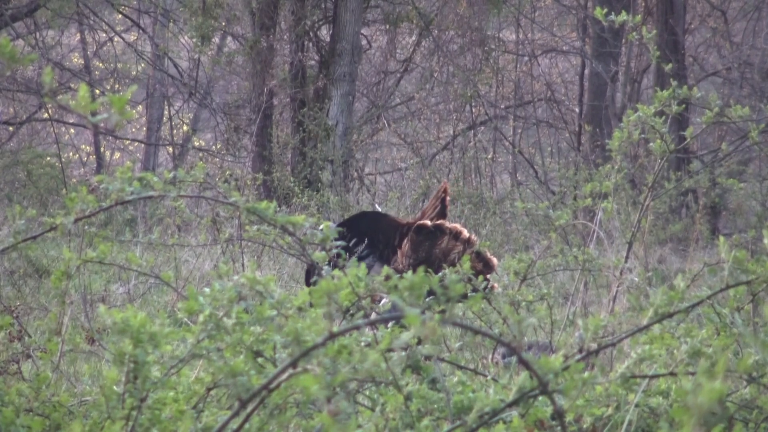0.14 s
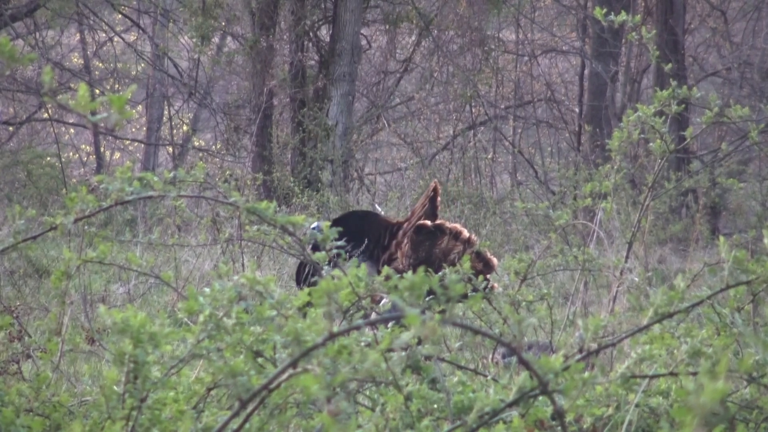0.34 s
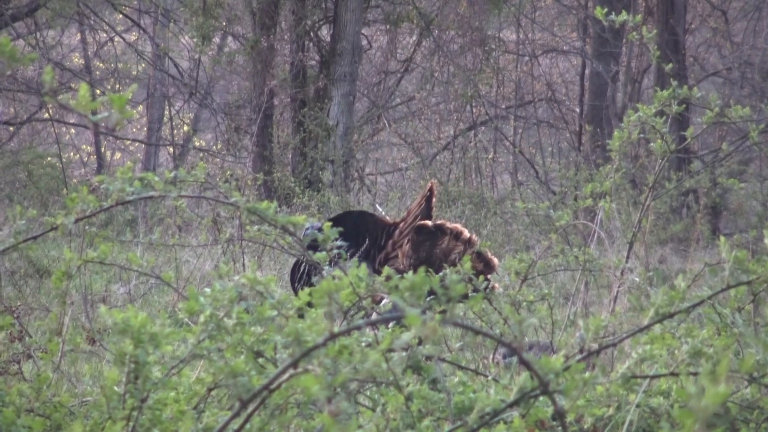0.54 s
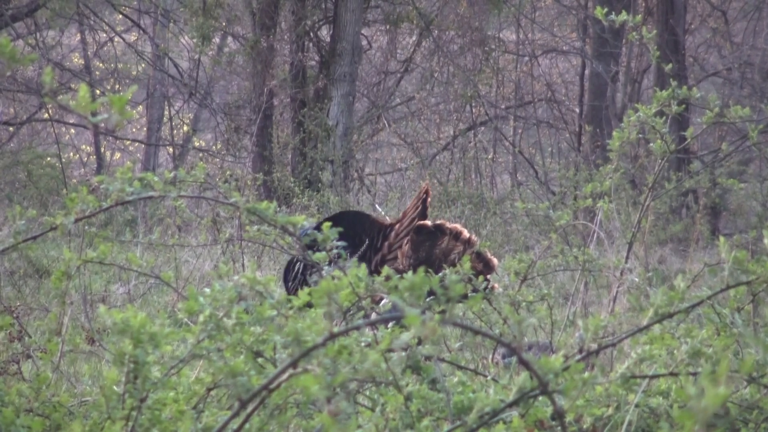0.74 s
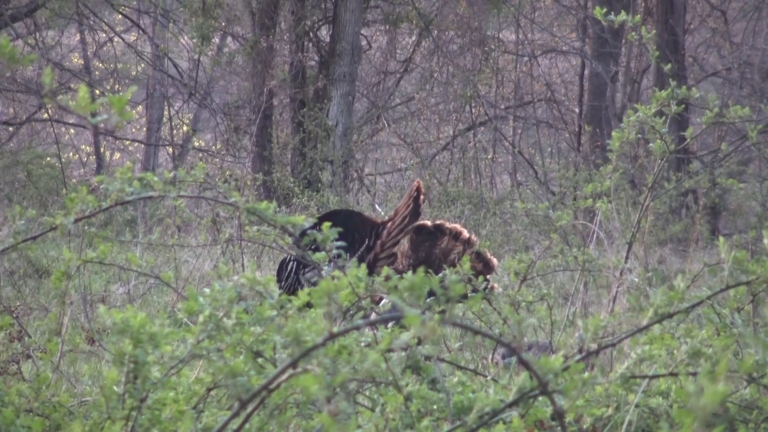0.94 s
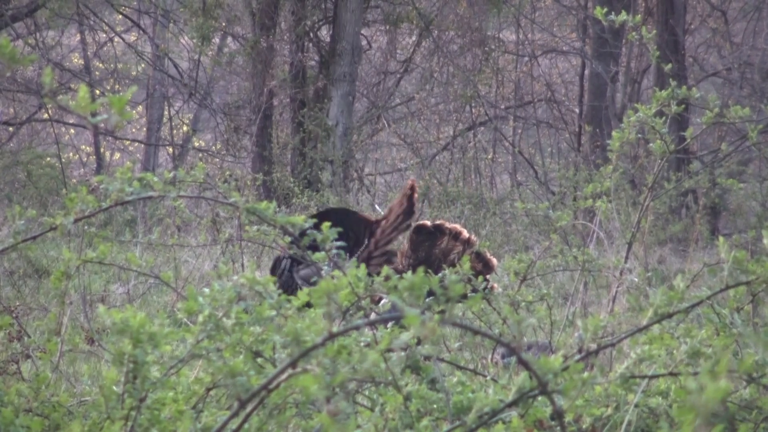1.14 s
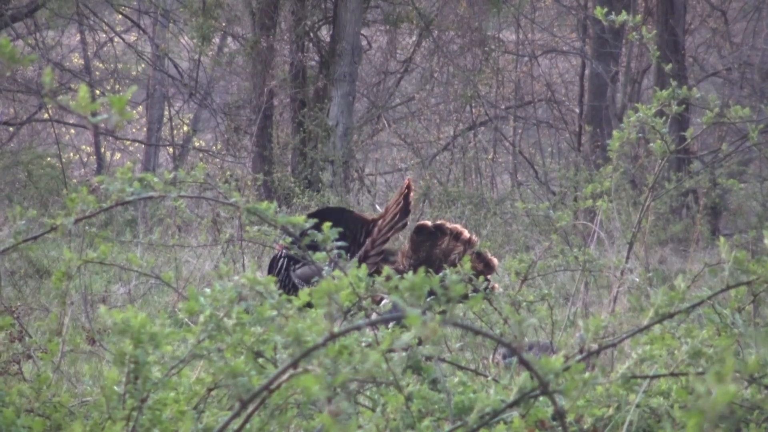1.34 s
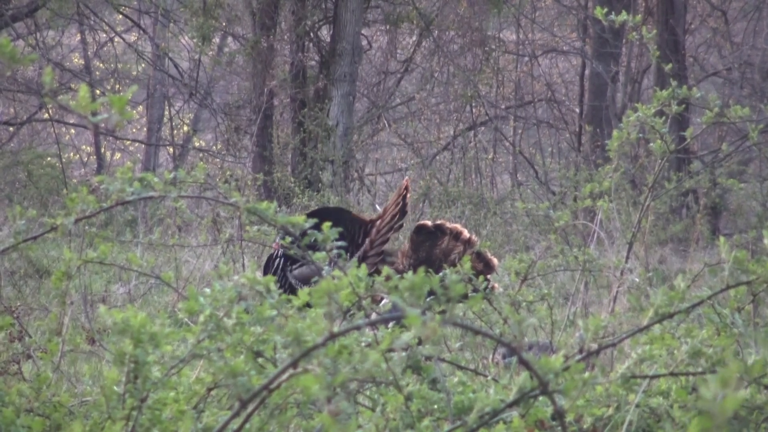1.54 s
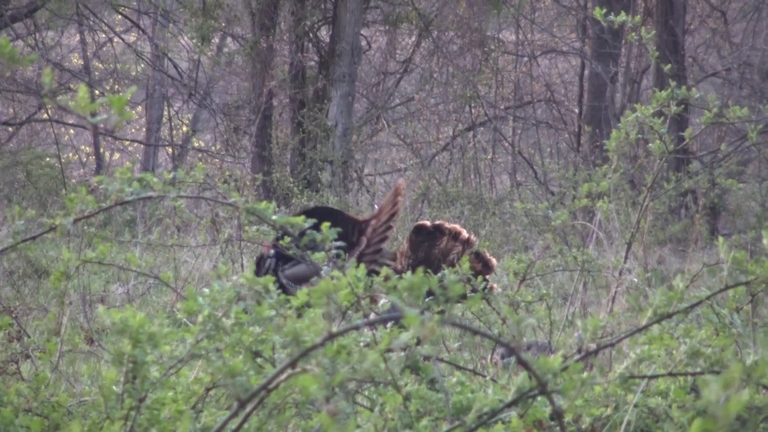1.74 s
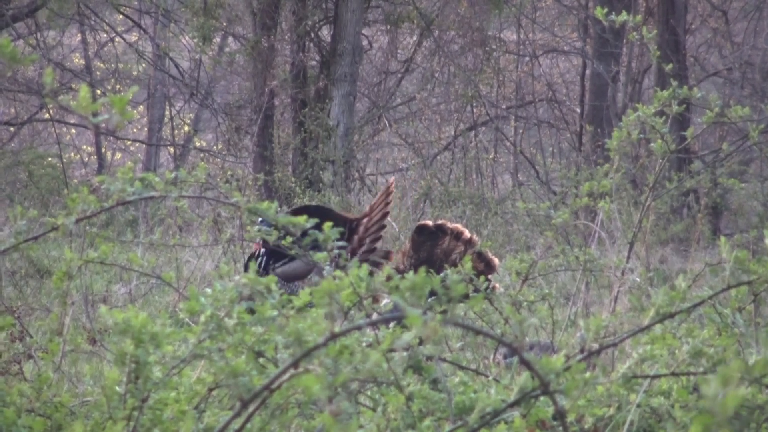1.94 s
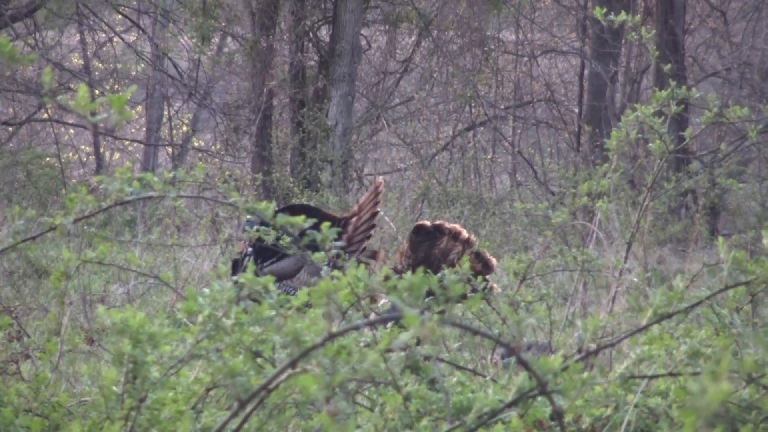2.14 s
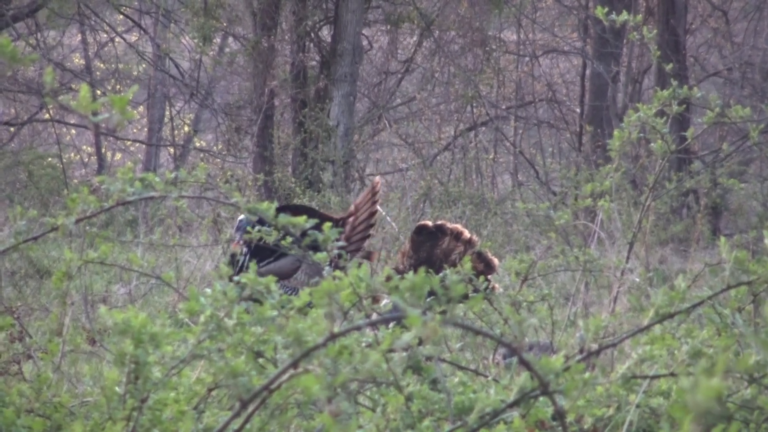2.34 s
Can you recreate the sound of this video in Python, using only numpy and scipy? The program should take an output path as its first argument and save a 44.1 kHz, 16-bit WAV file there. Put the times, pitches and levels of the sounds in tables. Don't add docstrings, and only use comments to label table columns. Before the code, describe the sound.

Wild turkey gives seven sharp, raspy clucks close by, ringing through spring woods with faint songbirds

```python
import sys
import numpy as np
from scipy import signal
from scipy.fft import rfft, irfft, next_fast_len
from scipy.io import wavfile
from scipy.ndimage import uniform_filter1d, map_coordinates

SR = 44100
rng = np.random.default_rng(int(sys.argv[2]) if len(sys.argv) > 2 else 0)


def level_to_linear(level):
    exponent = np.asarray(level, float) / 20
    return 10 ** exponent


def generate_wav(signal):
    frames = np.transpose(np.atleast_2d(signal))
    scaled = np.clip(frames, -1, 1) * 32767
    pcm = np.round(scaled).astype(np.int16)
    wavfile.write(sys.argv[1], SR, pcm)


N = 103635

# frequency [Hz], density [dB per Hz].
RUMBLE = [(12, -57.5), (20, -12), (102, 2.5), (168, 3), (265, -7.5), (357, -10), (414, -21), (461, -20.5),
          (500, -30), (650, -39), (1100, -120)]
# frequency [Hz], density [dB per Hz].
AIR = [(210, -61.5), (350, 0.5), (1540, -9), (2080, -15), (2600, -13), (3990, -19.5), (4470, -23),
       (5070, -23), (15700, -37)]
# frequency [Hz], density [dB per Hz].
LEAVES = [(200, -35), (350, -2.5), (800, -1), (1500, -2), (2300, -38.5)]
# centre [s], half length [s], level [dB].
GUSTS = [
    (0.784, 0.14, -39.5),
    (1.827, 0.027, -40.5),
    (1.32, 0.037, -39),
]
# frequency [Hz], time to fall 60 dB [s].
WOODS = [(500, 0.28), (1500, 0.99), (3000, 0.43), (4400, 0.36), (10000, 0.23)]

# time [s], pitch [Hz], level [dB].
NEAR_BIRD = [
    [(0, 4380, -27.5), (.05, 4372, -31.5), (.066, 4320, -37.5), (.078, 4440, -56.5)],
    [(.815, 4730, -59.5), (.83, 4650, -68), (.843, 5350, -56), (.855, 4260, -58), (.865, 3460, -80)],
    [(1.858, 4050, -64), (1.868, 5270, -42), (1.882, 3620, -58)],
    [(1.862, 3380, -58), (1.87, 3330, -45.5), (1.88, 2740, -86)],
    [(1.895, 4840, -66), (1.905, 3980, -44), (1.915, 3640, -52)],
    [(1.995, 4390, -62), (2.02, 4250, -33), (2.042, 4450, -41), (2.056, 4750, -42), (2.07, 5250, -41),
     (2.12, 5300, -49), (2.135, 5430, -54)],
    [(2.14, 4330, -53.5), (2.25, 4506, -52), (2.35, 4400, -51)],
    [(2.06, 3270, -37), (2.075, 3470, -52.5), (2.135, 3660, -34.5), (2.165, 3520, -40.5),
     (2.182, 3210, -53)],
]
# time [s], pitch [Hz], level [dB].
SEETS = [
    [(.512, 9730, -60), (.545, 7990, -44.5), (.575, 7580, -46), (.63, 7900, -46), (.67, 8540, -68),
     (.685, 8350, -80)],
    [(.52, 9900, -98.5), (.548, 8500, -46.5), (.585, 8300, -52), (.65, 9000, -56), (.68, 9000, -76)],
    [(2.0, 9500, -81), (2.03, 7940, -49.5), (2.048, 8000, -69), (2.06, 7900, -60)],
    [(2.27, 8100, -58), (2.3, 7520, -53.5), (2.33, 7370, -52), (2.35, 7620, -52)],
    [(2.285, 8300, -61), (2.31, 7900, -59), (2.35, 8100, -60)],
]
# time [s], pitch [Hz], level [dB].
WHISTLER = [
    [(.625, 2844, -57), (.64, 2910, -34.5), (.662, 2947, -29.5), (.68, 2890, -41), (.71, 2360, -38),
     (.73, 2360, -68)],
    [(.865, 2537, -51), (.898, 2907, -30), (.926, 2908, -28), (.945, 2883, -35.5), (.982, 2240, -35),
     (.998, 2200, -50)],
    [(1.11, 2550, -36.5), (1.15, 2850, -36.5), (1.17, 3100, -36.5)],
    [(1.245, 2880, -44), (1.28, 2910, -46), (1.35, 2846, -49.5)],
]
# time [s], pitch [Hz], level [dB].
WHISTLER_TURNS = [
    [(.75, 2270, -59), (.765, 2690, -42), (.78, 2700, -80)],
    [(.825, 2420, -60), (.835, 2550, -61), (.845, 2760, -55.5)],
    [(1.005, 2180, -41), (1.035, 2480, -48.5), (1.06, 2765, -36.5), (1.08, 2700, -67)],
    [(2.25, 2610, -104), (2.28, 2630, -45.5), (2.33, 2700, -64), (2.345, 2634, -60)],
]
# time in the note [s], pitch [Hz], level [dB].
TRILL_NOTE = [(0, 5750, -12), (.006, 5300, -3), (.014, 4350, 0), (.021, 3750, -14)]

STARTS = [.2085, .343, 1.0555, 1.1725, 1.381, 1.6575, 1.920]
# length [s], opening pitch [Hz], glide [share per s], clear part [s],
# rasp share inside the clear part [0-1].
CLEAR = [
    (.053, 570, 3.5, .034, .3),
    (.09, 1520, -.8, .038, .45),
    (.056, 790, 2, .012, .7),
    (.064, 2230, -9, .014, .15),
    (.069, 1515, 0, .011, .15),
    (.05, 750, 0, .025, .75),
    (.068, 1480, .5, .022, .55),
]
# low resonance [Hz], its level [dB], chest level [dB], late beak level [dB],
# level of the upper resonances [dB].
SHAPES = [(652, 6.5, 2, -4.5, 5), (1050, -11.5, 2, -2.5, -9), (860, -1.5, -11, 0.5, -0.5),
          (880, -23.5, -9, 5, -0.5), (896, -12, -11.5, 0.5, 1.5), (697, -4, -4.5, -1.4, -5),
          (710, 1.5, 0.2, -1.6, -2)]
# centre [Hz], width [Hz], level [dB].
UPPER = [(3275, 273, -18), (3990, 920, -25.5), (4250, 200, -20), (4970, 1400, -34.5), (7200, 5000, -48.5),
         (8100, 690, -37), (9790, 660, -36.5)]
# time [s], level [dB].
EFFORT = [
    [(0.208, -9), (0.216, -8), (0.257, -13), (0.264, -29.5)],
    [(0.343, -18.5), (0.347, -9), (0.367, -9.5), (0.431, -20.5), (0.436, -19.5)],
    [(1.056, -19.5), (1.064, -8.5), (1.106, -17), (1.114, -23.5)],
    [(1.173, -12), (1.177, -7.5), (1.185, -8), (1.239, -22)],
    [(1.381, -20.5), (1.385, -9), (1.449, -16), (1.452, -19)],
    [(1.657, -7), (1.663, -7.5), (1.702, -11), (1.71, -24)],
    [(1.92, -24), (1.926, -8), (1.972, -14.5), (1.99, -21)],
]
# level over the rasp [dB], overtone [dB],
# then its (time [s], pitch [Hz]) points.
STRANDS = [
    [(-1, -29, [(.246, 1500), (.258, 1260)])],
    [(3.5, -26, [(.382, 1430), (.41, 1581), (.435, 1771)]), (-4, -33.5, [(.404, 1850), (.42, 2144)]),
     (-29, -31.5, [(.36, 3740), (.376, 4100), (.43, 3190)]), (-28, -38.5, [(.348, 3337), (.39, 3350)])],
    [(1, -37, [(1.06, 1531), (1.079, 1244), (1.103, 1528)]), (1, -22.5, [(1.096, 1922), (1.113, 2225)])],
    [(3.5, -22, [(1.184, 1585), (1.222, 1432)]), (-13.5, -26, [(1.182, 830), (1.216, 860)]),
     (-5.5, -36.5, [(1.222, 1930), (1.239, 2090)])],
    [(3.5, -25.5, [(1.393, 1294), (1.405, 1548), (1.434, 1405), (1.452, 1682)]), (8, -31.5, [(1.414, 2127),
     (1.434, 2015), (1.452, 2195)]), (-11.5, -35, [(1.398, 868), (1.43, 842)])],
    [(-1, -17.5, [(1.684, 1880), (1.697, 1940)]), (0.19, -34, [(1.688, 1200), (1.71, 1152)])],
    [(-6.5, -13.5, [(1.948, 1943), (1.982, 1842)]), (-2, -28, [(1.942, 1408), (1.958, 1144),
     (1.974, 1286)])],
]
# echo level [dB], band thrown at the trees [Hz].
CLUCKS = [(-13.5, 1430), (-10.5, 1700), (-11.5, 1600), (-13, 1400), (-14.5, 1810), (-14, 1130),
          (-12.5, 1133)]


def unit(x):
    return x / np.sqrt(np.mean(x ** 2) + 1e-20)


def along(points, hz):
    f, v = np.transpose(points)
    return np.interp(np.log(hz + 1), np.log(f + 1), v)


def wobble(rate, size=N):
    knots = rng.standard_normal(int(size * rate / SR) + 4)
    return map_coordinates(knots, [np.arange(size) * rate / SR])


def filtered(x, response):
    m = next_fast_len(x.shape[-1] + 8192)
    spectrum = rfft(x, m) * response(np.fft.rfftfreq(m, 1 / SR))
    return irfft(spectrum, m)[..., :x.shape[-1]]


def add(track, x, s):
    part = track[round(s * SR):][:len(x)]
    part += x[:len(part)]


def noise(spectrum):
    return unit(filtered(rng.standard_normal(N), lambda hz: level_to_linear(along(spectrum, hz))))


def background():
    rumble = unit(noise(RUMBLE) * level_to_linear(3.8 * wobble(12.32) + 0.86 * wobble(7.1)))
    air = level_to_linear(-47 + 0.36 * wobble(0.74)) * noise(AIR)
    t = np.arange(N) / SR
    gusts = sum(level_to_linear(db) * np.exp(-((t - s) / half) ** 2) for s, half, db in GUSTS)
    gusts = gusts * level_to_linear(6.4 * wobble(25))
    return level_to_linear(-41) * rumble + air + gusts * noise(LEAVES)


def woods(x):
    first_trunk_s, mottle_db = .008, 6.5
    slope_s, slope_db, slope_spread_s = 0.0975, 8, 0.047
    hz, t, z = signal.stft(rng.standard_normal(SR), SR, nperseg=256)
    patches = uniform_filter1d(rng.standard_normal(z.shape), size=2, axis=0)
    patches = unit(uniform_filter1d(patches, size=12, axis=1))
    slope = slope_db * np.exp(-((t - slope_s) / slope_spread_s) ** 2)
    decay = -60 * t / along(WOODS, hz)[:, None]
    tail = signal.istft(z * level_to_linear(mottle_db * patches + slope + decay), SR, nperseg=256)[1]
    delayed = np.pad(x, (round(first_trunk_s * SR), 0))
    return signal.fftconvolve(delayed, tail / np.linalg.norm(tail))


def whistle(note):
    s, hz, db = np.transpose(note)
    t = np.arange(s[0], s[-1], 1 / SR)
    pitch = uniform_filter1d(np.interp(t, s, hz), 200, mode="nearest")
    pitch = pitch * (1 + 0.004 * wobble(150, size=len(t)))
    level = np.sqrt(2) * level_to_linear(np.interp(t, s, db) + 2.5 * wobble(110, size=len(t)))
    tone = level * np.sin(2 * np.pi * np.cumsum(pitch) / SR)
    fade_in = np.clip((t - s[0]) / 0.00048, 0, 1)
    fade_out = np.clip((s[-1] - t) / 0.0027, 0, 1)
    return tone * fade_in * fade_out


def songbirds():
    trill_s, gap_s = 2.047, .0565
    trill = []
    for k, level in enumerate([-52, -50, -47, -45, -45, -45]):
        trill.append([(trill_s + k * gap_s + s, hz, db + level) for s, hz, db in TRILL_NOTE])
    out = np.zeros(N)
    for note in [*NEAR_BIRD, *SEETS, *WHISTLER, *WHISTLER_TURNS, *trill]:
        tone = whistle(note)
        add(out, tone, note[0][0])
        add(out, level_to_linear(-5) * woods(tone), note[0][0])
    return out


def resonances(rows):
    def response(f):
        total = 0
        for k, (c, w, db) in enumerate(rows):
            total = total + (-1) ** k * level_to_linear(db) * (1j * f * w / (c * c - f * f + 1j * f * w)) ** 2
        return total
    return response


def throat(x, part, shape, done):
    low_hz, low_db, chest_db, beak_db, upper_db = shape
    low_fade_db, shift_db, first_gap_db = 23.5, 1.5, -18

    def upper_response(hz):
        gap = (hz < 3500) & (low_hz < 680)
        return resonances(UPPER)(hz) * np.where(gap, level_to_linear(first_gap_db), 1)

    low = filtered(x, resonances([(low_hz, 300, low_db)])) * level_to_linear(-low_fade_db * done)
    chest_and_main = filtered(x, resonances([(1180, 200, chest_db), (1510, 230, 0)]))
    mid = chest_and_main * level_to_linear(-shift_db * done) + filtered(x, resonances([(1860, 170, -4)]))
    beak = filtered(x, resonances([(2070, 150, beak_db)])) * (0.51 + 0.15 * done)
    upper = level_to_linear(upper_db - shift_db * done) * filtered(x, upper_response)
    out = low - mid + beak + upper
    return out / np.std(out[part])


def steady_pulses(t, pitch_hz, glide, clear):
    pitch = pitch_hz * (1 + glide * np.minimum(t, clear) + .012 * wobble(270, size=len(t)))
    phase = 2 * np.pi * np.cumsum(pitch) / SR
    harmonics = sum(np.cos(k * phase) / k ** 0.089 for k in range(1, int(10000 / pitch_hz)))
    return harmonics * level_to_linear(3 * wobble(290, size=len(t)))


def rasp_pulses(t):
    rasp_hz, scatter, size_db, hiss = 335, .12, 3, .42
    draw = rng.standard_normal((80, 2))
    when = np.cumsum(np.exp(scatter * draw[:, 0])) / rasp_hz
    pulses = np.bincount((when * SR).astype(int), level_to_linear(size_db * draw[:, 1]), len(t))[:len(t)]
    return unit(pulses) + hiss * rng.standard_normal(len(t))


def strand(t, db, overtone_db, points):
    s, hz = np.transpose(points)
    pitch = uniform_filter1d(np.interp(t, s, hz), 150, mode="nearest")
    pitch = pitch * (1 + .028 * wobble(194, size=len(t)))
    phase = 2 * np.pi * np.cumsum(pitch) / SR
    edge = np.clip(np.minimum(t - s[0], s[-1] - t) / .004, 0, 1)
    level = level_to_linear(db + 4.5 * wobble(223, size=len(t)))
    return edge * level * (np.sin(phase) + level_to_linear(overtone_db) * np.sin(2 * phase))


def cluck(length, pitch_hz, glide, clear, rough, shape, start, effort, strands):
    attack_s, release_s, break_s, even_s = 0.002, 0.0048, 0.0031, .016
    crack_db, crack_s, crack_hz = -20, .026, 6400
    t = np.arange(SR // 8) / SR
    done = np.clip(t / length, 0, 1)
    rasp = rasp_pulses(t)
    clear_voice = throat(steady_pulses(t, pitch_hz, glide, clear), t < clear, shape, done)
    raspy_voice = level_to_linear(-2) * throat(rasp, t < length, shape, done)
    broken = np.clip((t - clear) / break_s + .5, 0, 1)
    voice = (1 - broken) * clear_voice + np.maximum(broken, rough) * raspy_voice
    voice = voice + sum(strand(start + t, *row) for row in strands)
    power = np.abs(uniform_filter1d(voice ** 2, round(even_s * SR)))
    voice = voice / np.sqrt(power + 0.0049)
    crack = filtered(rasp, lambda hz: (hz > 2500) / (1 + (hz / crack_hz) ** 2))
    crack = level_to_linear(crack_db - 20 * t / crack_s) * crack
    level_db = 1.93 + np.interp(start + t, *np.transpose(effort))
    level_db = level_db - 20 * np.clip(t - length, 0, 1) / release_s
    return (voice + crack) * np.clip(t / attack_s, 0, 1) * level_to_linear(level_db)


def echo(call, echo_db, thrown_hz):
    late_db, late_s, dull_hz = 11, 0.037, 950
    t = np.arange(len(call)) / SR
    late = call * level_to_linear(late_db * (np.clip(t / late_s, 0, 1) - 1))
    late = late * (1 + .9 * wobble(700, size=len(late)))
    late = filtered(late, lambda hz: 1 - 0.58 / (1 + (hz / dull_hz) ** 8))
    late = late + filtered(late, resonances([(thrown_hz, 270, 6.5)]))
    return level_to_linear(echo_db) * woods(late * np.std(call) / np.std(late))


def turkey():
    out = np.zeros(N)
    rows = zip(STARTS, CLUCKS, CLEAR, SHAPES, EFFORT, STRANDS)
    for s, (echo_db, thrown_hz), pitch, shape, effort, strands in rows:
        call = cluck(*pitch, shape, s, effort, strands)
        add(out, call, s)
        add(out, echo(call, echo_db, thrown_hz), s)
    return out


def scene():
    mid = background() + songbirds() + turkey()
    side = level_to_linear(-33) * mid * wobble(40)
    return np.array([mid + side, mid - side])


def roll_off(x):
    return signal.sosfilt(signal.butter(12, 16620, fs=SR, output="sos"), x)


def record(dry):
    top_hz, fizz_hz, hardness = 15800, 11600, 6
    threshold_db, squeeze, sense_s, lag_s, glide_s = -20, 1.9, .005, .011, .022
    keep_low_hz, keep_high_hz, high_share = 650, 5500, .7
    fizz = rng.standard_normal(N) + .2 * rng.standard_normal((2, N))
    fizz = filtered(fizz, lambda hz: (hz > fizz_hz) * (hz < top_hz))
    x = dry + level_to_linear(-67) * unit(fizz)
    keep = np.exp(-1 / (sense_s * SR))
    power = signal.lfilter([1 - keep], [1, -keep], dry.mean(0) ** 2)
    over_db = np.clip(10 * np.log10(power + 1e-12) - threshold_db, 0, None)
    cut_db = uniform_filter1d(squeeze * over_db, round(glide_s * SR))
    cut_db = np.pad(cut_db, (round((lag_s + glide_s / 2) * SR), 0))[:N]
    lows = filtered(x, lambda hz: 1 / (1 + (hz / keep_low_hz) ** 8))
    highs = filtered(x, lambda hz: 1 - 1 / (1 + (hz / keep_high_hz) ** 8))
    x = x - lows * (1 - level_to_linear(-cut_db)) - highs * (1 - level_to_linear(-high_share * cut_db))
    x = x / (1 + np.abs(x) ** hardness) ** (1 / hardness)
    mix = filtered(x, lambda hz: hz < top_hz)
    return roll_off(mix)


dry = scene()
out = record(dry)
generate_wav(out)
```